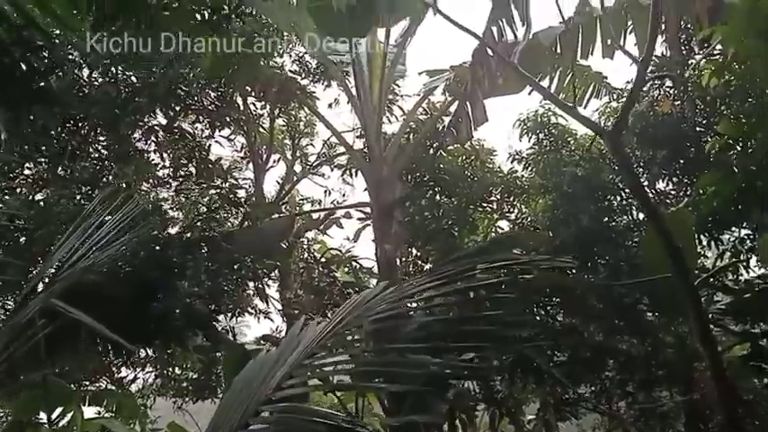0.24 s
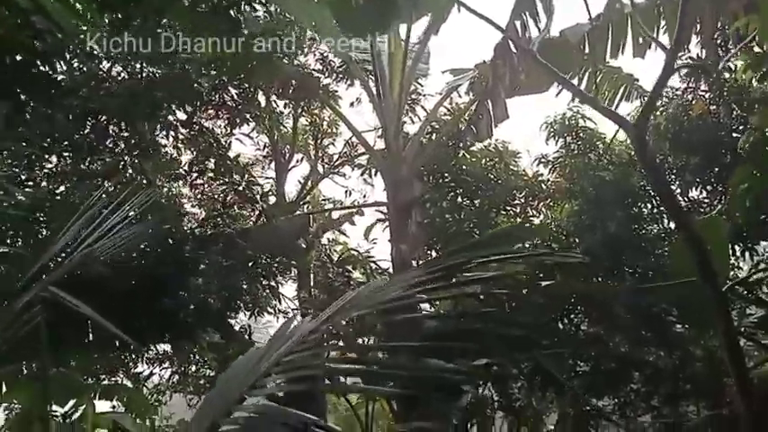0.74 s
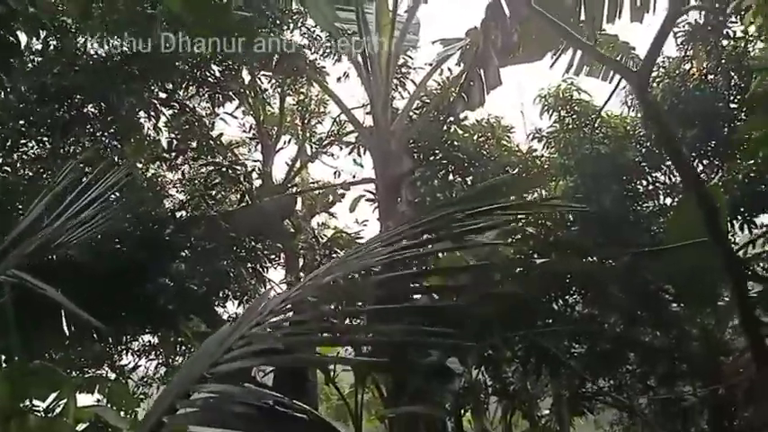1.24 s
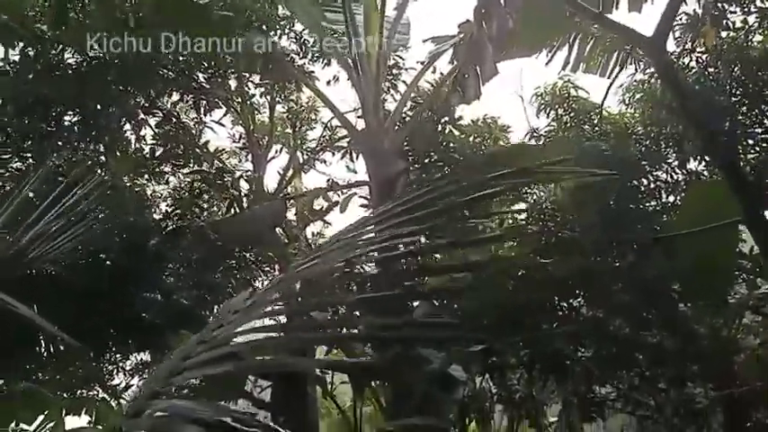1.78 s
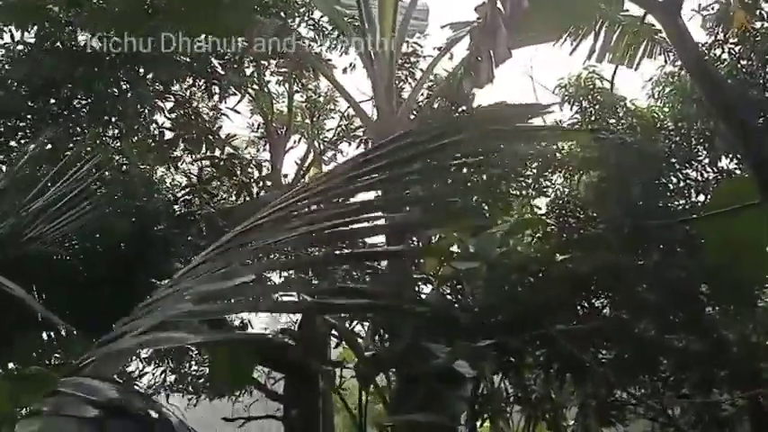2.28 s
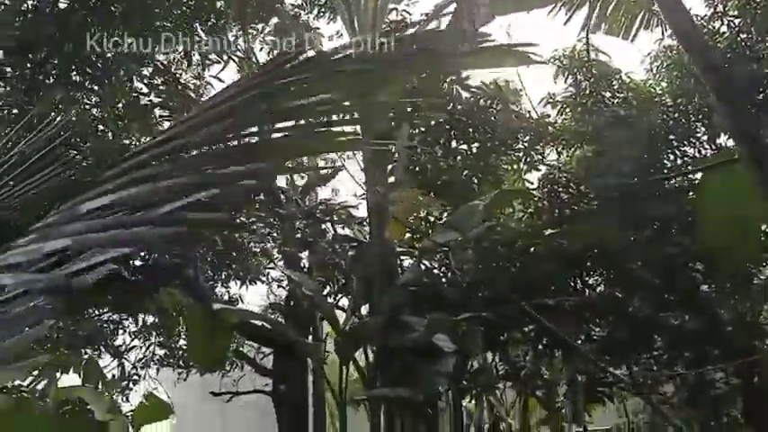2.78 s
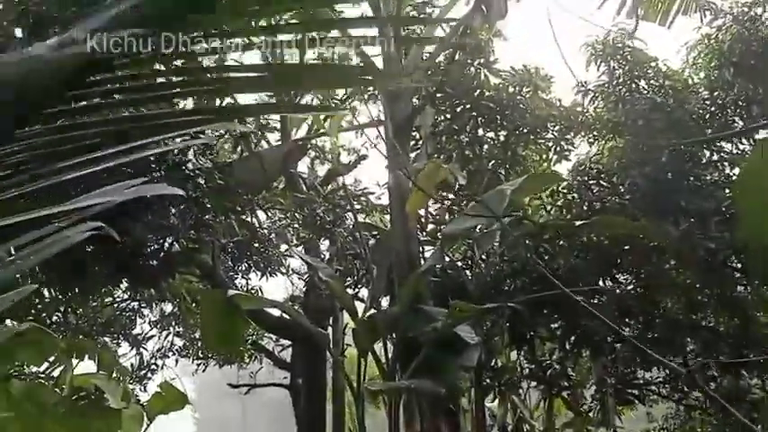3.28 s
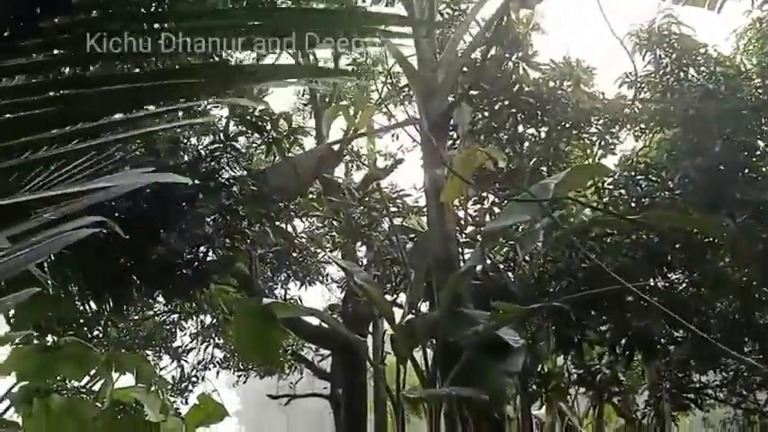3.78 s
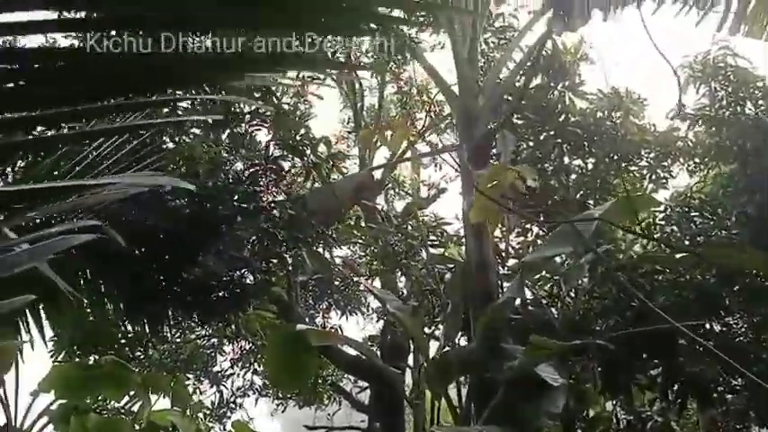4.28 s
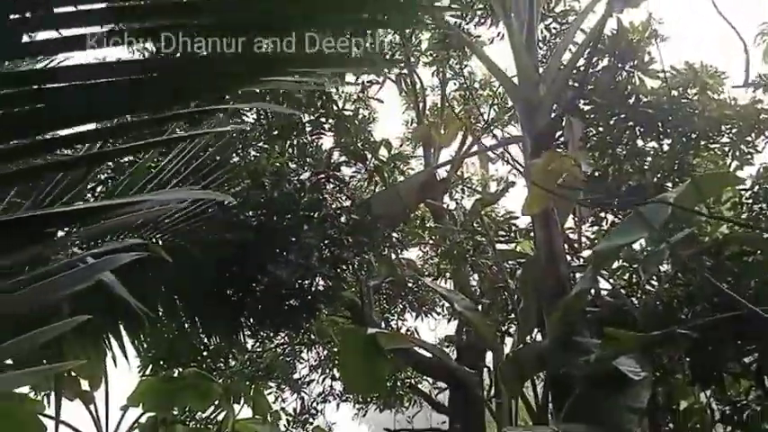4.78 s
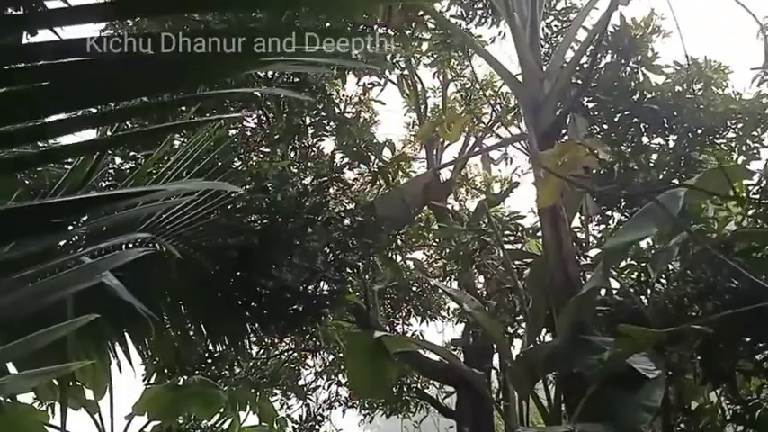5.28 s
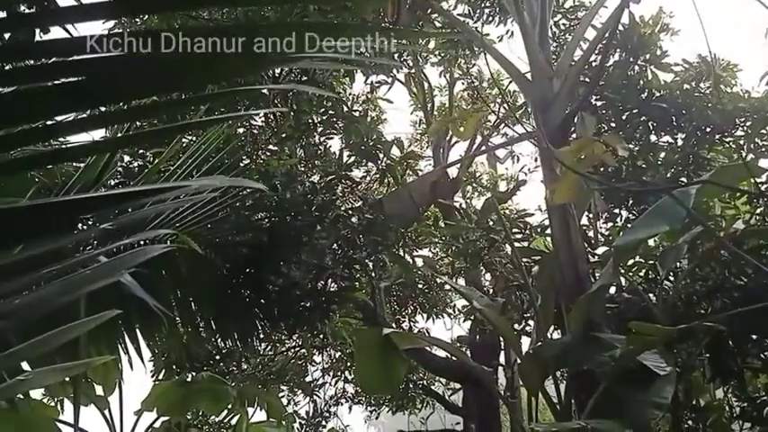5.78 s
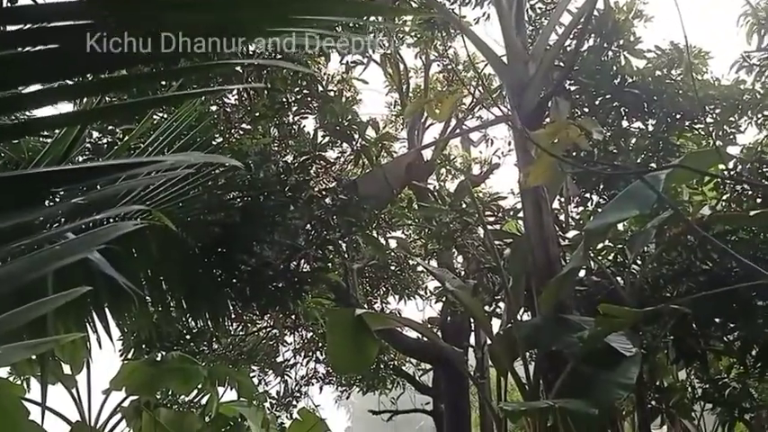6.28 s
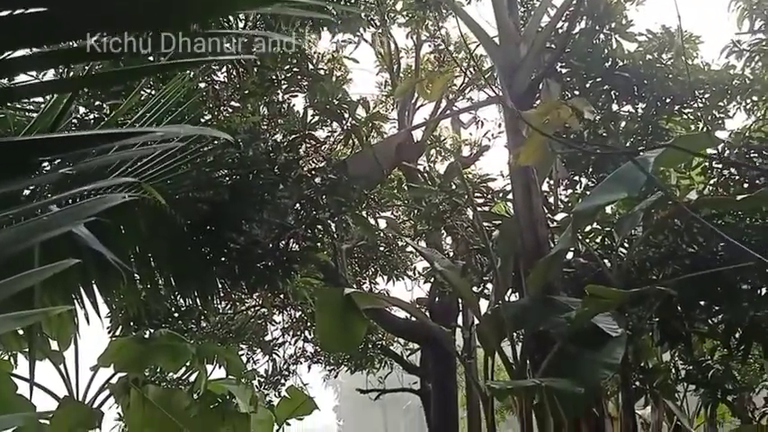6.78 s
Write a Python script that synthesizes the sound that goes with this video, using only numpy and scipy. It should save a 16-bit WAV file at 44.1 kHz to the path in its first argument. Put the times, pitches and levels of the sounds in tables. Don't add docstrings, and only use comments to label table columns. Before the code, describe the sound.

A leafy garden full of birds, heard in wide stereo for about seven seconds. From 0.25 s to the end, a nearby bird repeats a high, bright cheep that scoops upward and holds briefly, roughly every half second. Behind it a flock scolds hoarsely, raspy and breathy, swelling near 0.9, 1.5, 2.7, 3.7, 4.5 s and again from 5.7 s, mixed with short rough caws. A dove hums faintly until about 1.6 s. Dry little bill snaps tick between 1.8 and 5.2 s. Farther birds scatter thin whistles, reedy notes and downward slides throughout. From 5.45 s quick faint chips trill as a singer slurs a buzzy whistle up and down, then up again until 6.6 s; a tiny nasal squeak comes at 6.95 s. Notes waver and echo softly off leaves. Gentle airy hiss, far traffic and a barely audible low engine continue underneath.

```python
import sys
import numpy as np
from scipy import signal
from scipy.fft import rfft, irfft
from scipy.io import wavfile
from scipy.ndimage import uniform_filter1d

SR = 44100
rng = np.random.default_rng(int(sys.argv[2]) if len(sys.argv) > 2 else 0)


def field_ratio(decibels):
    return 10 ** (np.asarray(decibels, dtype=float) / 20)


def dump_mix(stems):
    frames = np.atleast_2d(stems).T
    limited = np.clip(frames, -1, 1)
    pcm = np.round(limited * 32767).astype(np.int16)
    wavfile.write(sys.argv[1], SR, pcm)


N = 310905


def rms_one(x):
    return x / np.sqrt(np.mean(np.abs(x) ** 2) + 1e-20)


def at_hz(points, hz):
    point_hz, point_db = np.array(points)[:, 0], np.array(points)[:, 1]
    return np.interp(np.log(hz), np.log(point_hz), point_db)


def bin_hz():
    return np.maximum(np.arange(N // 2 + 1) * SR / N, 1)


def span(rows):
    s, *columns = np.transpose(rows)
    at = np.arange(round(s[0] * SR), min(round(s[-1] * SR), N))
    return at[0], [np.interp(at / SR, s, c) for c in columns]


def seconds(length):
    return np.arange(round(length * SR)) / SR


def drift(size, rate_hz, channels):
    step, settle = 16, 1500
    r = np.exp(-2 * np.pi * rate_hz * step / SR)
    smoothing = [[1, 0, 0, 1, -2 * r, r * r], [1, 0, 0, 1, -r * r, 0]]
    noise = rng.standard_normal((channels, size // step + settle + 2))
    slow = signal.sosfilt(smoothing, noise)[:, settle:]
    return np.array([np.interp(np.arange(size) / step, np.arange(len(v)), rms_one(v)) for v in slow])


def add(out, at, sound, pan_db=0):
    size = min(sound.shape[1], N - at)
    out[:, at:at + size] += (sound * field_ratio(np.array([[.5], [-.5]]) * pan_db))[:, :size]


def voiced(t, attack_s, hold_s, fade_db_per_s):
    return -30 * np.clip(1 - t / attack_s, 0, 9) - fade_db_per_s * np.maximum(t - hold_s, 0)


def whistle(hz, db, scatter, waver_hz):
    phase = 2 * np.pi * (np.cumsum(hz) / SR + rng.random())
    paths = drift(len(hz), waver_hz, channels=4)
    share = np.clip(scatter, 0, 1)
    from_ends = np.minimum(np.arange(len(hz)), np.arange(len(hz))[::-1])
    edge = np.minimum(from_ends / (0.0016 * SR), 1)
    in_phase = (np.sqrt(2 - 2 * share) + np.sqrt(share) * paths[:2]) * np.sin(phase)
    return field_ratio(db) * edge * (in_phase + np.sqrt(share) * paths[2:] * np.cos(phase))


def coloured(source, spectrum):
    return rms_one(irfft(rfft(source) * field_ratio(at_hz(spectrum, bin_hz())), N))


def near_bird():
    # start in seconds, time to full voice in seconds, first partial in dB, octave in dB,
    # share of the pitch it starts below.
    cheeps = [(0.251, 0.063, -33, -27, 0.087), (0.664, 0.08, -34.5, -28.5, 0.048),
              (1.119, 0.086, -40.5, -30, 0.062), (1.552, 0.079, -39.5, -30.5, 0.079),
              (2.067, 0.07, -37.5, -28, 0.05), (2.581, 0.093, -38.5, -32.5, 0.024),
              (3.103, 0.057, -34.5, -30.5, 0.053), (3.635, 0.073, -35.5, -31, 0.0347),
              (4.152, 0.07, -38, -30.5, 0.018), (4.64, 0.072, -34, -31, 0.03),
              (5.169, 0.068, -35.5, -30, 0.014), (5.66, 0.054, -36, -26.5, 0.019),
              (6.104, 0.069, -37.5, -27.5, 0.061), (6.502, 0.073, -35, -25, 0.083)]
    # multiple of the pitch, level in dB relative to the octave.
    upper_partials = [(3, -23), (4, -31.5)]
    top_hz, rise_s, sag_per_s = 3352, 0.01207, 0.0549
    first_attack_s, octave_attack_s, swell_depth_db = .009, 0.014, 4.5
    first_fade_db_per_s, octave_fade_db_per_s = 300, 248
    octave_late_db, octave_late_s = 7.5, 0.088
    flutter_width_hz = 75
    out, t = np.zeros((2, N)), seconds(.3)
    scatter = 0.33 + 3.35 * t
    flutter_db = -6 - 9 * t / .045
    for s, full_s, first_db, octave_db, scoop in cheeps:
        at = round(s * SR)
        bend = scoop * np.exp(-np.maximum(t - .005, 0) / rise_s) + sag_per_s * np.minimum(t, .15)
        hz = top_hz * (1 + 0.00152 * rng.standard_normal()) * (1 - bend)
        swell_db = -swell_depth_db * np.maximum(1 - t / full_s, 0)
        low_db = first_db + swell_db + voiced(t, first_attack_s, full_s, first_fade_db_per_s)
        high_db = octave_db + swell_db + voiced(t, octave_attack_s, full_s, octave_fade_db_per_s)
        high_db = high_db - octave_late_db * np.exp(-t / octave_late_s)
        add(out, at, whistle(hz, low_db, scatter, 29.8))
        add(out, at, whistle(2 * hz, high_db, scatter, 54.6))
        add(out, at, whistle(hz, low_db + flutter_db, 0.99, flutter_width_hz))
        add(out, at, whistle(2 * hz, high_db + flutter_db, 1, 2 * flutter_width_hz))
        catch_db = octave_db - 30.5 + voiced(t, 0.0052, 0.018, 600)
        add(out, round((s - .008) * SR), whistle(5200 + 0 * t, catch_db, 1, 140))
        for multiple, db in upper_partials:
            add(out, at, whistle(multiple * hz, high_db + db, 0.78, 55))
    return out


def song():
    # time in seconds, pitch in Hz, effort in dB, beak opening as dB of the upper partials.
    slurs = [
        [(5.465, 533.4, -58, 3), (5.55, 623.7, -48, 0), (5.605, 663, -46, 2), (5.636, 786, -40.5, 2),
         (5.72, 807, -37, -8), (5.8, 802, -38, -16), (5.86, 717, -43.5, -26), (5.95, 617, -44.5, -26),
         (6.01, 599, -45, -18)],
        [(6.01, 597, -48, -21), (6.08, 699.5, -44, -18), (6.17, 682, -40.5, -5), (6.255, 709.4, -37, -1.5),
         (6.275, 749.4, -35, -11), (6.4, 763, -44, 0), (6.5, 797, -45, 5), (6.53, 785, -41.5, -6),
         (6.57, 702, -45, 1)],
    ]
    # frequency in Hz, level in dB.
    singer_throat = [(700, -38), (1250, -19), (1650, -17), (2350, 1), (3100, -5), (3900, -35)]
    out = np.zeros((2, N))
    for slur in slurs:
        at, (hz, db, open_db) = span(slur)
        rasp_db = np.minimum(-4.5 - .08 * (hz - 700), 3)
        hz = hz * (1 + .007 * drift(len(hz), 40, channels=1)[0])
        for multiple in range(1, 6):
            upper = multiple > 3
            level_db = db + at_hz(singer_throat, multiple * hz) + open_db * upper
            partial_rasp_db = level_db + rasp_db - 8 * (multiple < 3)
            add(out, at, whistle(multiple * hz, level_db, .5 + 0.42 * upper, 22), 1.5)
            add(out, at, whistle(multiple * hz, partial_rasp_db, 0.63, 200), 1.5)
    return out


def squeak():
    # start in seconds, length in seconds, pitch in Hz.
    s, length, squeak_hz = (6.947, 0.04, 1185)
    # multiple of the pitch, level in dB.
    squeak_partials = [(1, -68), (2, -32.5), (3, -36), (4, -50), (5, -49.5), (6, -51), (7, -56), (9, -74)]
    out, t = np.zeros((2, N)), seconds(.12)
    for multiple, db in squeak_partials:
        level_db = db - 2.5 - 20 * (t > length) - 60 * t
        add(out, round(s * SR), whistle(multiple * squeak_hz + 0 * t, level_db, 0.39, 18.5))
    return out


def caws():
    # start in seconds, length in seconds, first pitch in Hz, last pitch in Hz, level in dB.
    caw_rows = [(0.199, 0.079, 508, 532, -50.5), (0.766, 0.16, 493, 513, -58.5),
                (0.963, 0.13, 536, 501, -53), (1.333, 0.076, 352, 343.6, -54.5),
                (1.659, 0.13, 449, 457, -63.5), (2.629, 0.18, 344, 349, -57),
                (2.873, 0.13, 383, 372, -56.5), (3.738, 0.082, 488, 483, -62),
                (4.234, 0.18, 449, 515, -51.5), (4.45, 0.13, 481, 530.5, -52),
                (4.598, 0.13, 254.7, 282.6, -47), (4.736, 0.056, 513.5, 506, -49.5),
                (5.194, 0.06, 507, 488, -51), (5.463, 0.14, 527, 644, -55), (6.02, .1, 620, 714, -47.5),
                (6.045, 0.097, 518.5, 533, -50), (6.714, 0.15, 494.5, 511, -57.5),
                (6.563, .15, 441, 446, -54), (6.885, .07, 312, 312, -59)]
    # frequency in Hz, level in dB.
    caw_throat = [(1000, -32), (1400, -20.5), (1600, -12), (2100, -5.5), (2600, -3), (3200, -14),
                  (4200, -24), (5200, -33)]
    out = np.zeros((2, N))
    for s, length, first_hz, last_hz, db in caw_rows:
        at, t = round(s * SR), seconds(length + .06)
        glide_hz = last_hz + (first_hz - last_hz) * np.maximum(1 - t / length, 0) ** 2
        hz = glide_hz * (1 + .006 * drift(len(t), 30, channels=1)[0])
        voice_db = db + voiced(t, .008, length, 501)
        uneven_db = 2.0 * drift(len(t), 7.4, channels=15)
        for multiple in range(3, 15):
            level_db = voice_db + at_hz(caw_throat, multiple * hz) + uneven_db[multiple]
            add(out, at, whistle(multiple * hz, level_db, .6, 25), 1.5)
            add(out, at, whistle(multiple * hz, level_db + 1.5, 1, 120), 1.5)
    return out


def snaps():
    # start in seconds, peak level in dB, ringing frequency in Hz.
    clicks = [(2.089, -39.5, 2440), (2.296, -45, 1930), (2.5252, -53, 1480), (2.547, -56, 1900),
              (2.337, -58, 2000), (2.353, -65, 1950), (1.796, -48, 1700), (1.821, -58, 1510),
              (1.906, -57, 1800), (3.285, -44.5, 1900), (3.3523, -38.5, 2090), (3.7371, -39, 1870),
              (3.74, -47, 513), (3.756, -41, 1900), (3.121, -44, 2100), (3.145, -50, 1690),
              (3.95, -42, 1910), (4.2822, -33, 2250), (4.8457, -47, 1510), (4.903, -41, 2570),
              (5.001, -54, 1600), (5.015, -51, 1610), (5.034, -52, 1600), (4.076, -50, 1710),
              (4.094, -53, 1710), (3.921, -45, 1730), (5.184, -39, 2100), (5.2134, -43, 2600),
              (5.2383, -33.5, 2020)]
    out, t = np.zeros((2, N)), seconds(.03)
    for s, db, hz in clicks:
        ring = np.sin(2 * np.pi * hz * t) * np.exp(-t / 0.0015) * np.minimum(t / 0.00026, 1)
        add(out, round(s * SR), field_ratio(db + 2.5) * np.array([ring, ring]))
    return out


def glided(rows, octave_db, third_db=-60, scatter=0.64, waver_hz=80):
    out = np.zeros((2, N))
    for s, length, first_hz, last_hz, db, pan_db in rows:
        t = seconds(length + .01)
        if first_hz < 1.02 * last_hz:
            remaining = np.exp(-t / (0.006 + min(.2 * length, .02)))
        else:
            remaining = np.maximum(1 - t / length, 0)
        hz = last_hz + (first_hz - last_hz) * remaining
        hz = hz * (1 + .004 * drift(len(t), 30, channels=1)[0])
        level_db = db - 2.0 - 9 * np.exp(-t / 0.0008)
        sound = whistle(hz, level_db, scatter, waver_hz)
        sound = sound + whistle(2 * hz, level_db + octave_db, 0.95, 93)
        sound = sound + whistle(3 * hz, level_db + third_db, 0.9, 140)
        add(out, round(s * SR), sound, pan_db)
    return out


def close_notes():
    # start in seconds, length in seconds, first pitch in Hz, last
    # pitch in Hz, level in dB.
    gulps = [
        (6.195, 0.0255, 1100, 764, -74),
        (6.586, 0.022, 1560, 760, -54.5),
        (3.9, .05, 410, 348, -65),
        (3.87, 0.082, 385, 380, -68),
        (2.59, .04, 415, 350, -69),
        (6, .05, 510, 840, -66.5),
    ]
    # start in seconds, length in seconds, first pitch in Hz, last pitch in Hz, level in dB,
    # left-right difference in dB.
    clear_notes = [(0.775, .165, 1960, 2065, -48.5, -1), (4.5, .09, 1700, 2300, -50, -5),
                   (4.025, 0.039, 2820, 2770, -53.5, 0), (4.085, 0.039, 3480, 3130, -53, -1),
                   (0.113, 0.023, 2880, 2620, -52, -4), (9.7, 0.1, 3400, 2200, -53, -1),
                   (5.2, 0.073, 2900, 2530, -49.5, -3), (3.98, 0.047, 2630, 2640, -60, -5),
                   (4.08, 0.1, 2200, 2500, -56, 0), (4.235, 0.24, 1450, 1570, -62, 1),
                   (1.66, 0.12, 1800, 1600, -64, 0), (2.88, 0.12, 2830, 2610, -51.5, 0),
                   (0.17, 0.028, 2700, 2450, -55, -5), (0.2, 0.22, 2300, 2680, -57, 0),
                   (0.375, 0.055, 2900, 2830, -51.5, -2), (0.59, .065, 2860, 2600, -52.5, 1),
                   (2.76, 0.07, 3120, 4000, -57, 2), (2.6, 0.036, 3120, 2400, -57, 2),
                   (0.83, 0.11, 3040, 2600, -56, 4), (1.285, 0.093, 3335, 3800, -52.5, -4)]
    return glided([(*row, 0) for row in gulps] + clear_notes, -31, scatter=0.24, waver_hz=25)


def held(rows, scoop):
    return [(s, length, hz * (1 - scoop), hz, db, pan_db) for s, length, hz, db, pan_db in rows]


def neighbours():
    # start in seconds, length in seconds, pitch in Hz,
    # level in dB, left-right difference in dB.
    far_cheeps = [(0.03, 0.1, 3218, -57.5, 2), (0.52, 0.12, 3192, -59, 0), (0.92, 0.096, 3170, -60, 0),
                  (1.44, 0.049, 3230, -68, 7), (2.0, 0.069, 3220, -59, 4.5), (3.2, 0.16, 3176, -55, -1),
                  (3.55, 0.1, 3240, -57.5, 11.5), (3.89, 0.087, 3262, -55.5, -1.5),
                  (4.96, 0.073, 3250, -57, -2.5)]
    pure_notes = [(0.13, 0.043, 1750, -61, -3), (0.39, 0.1, 1778, -65.5, 1), (0.48, 0.027, 1976, -62.5, -5),
                  (0.97, 0.063, 2570, -53, 2), (1.5, 0.39, 1800, -63, -5), (1.55, 0.26, 1130, -68.5, 1),
                  (2.2, 0.04, 2650, -59, 2), (2.39, 0.055, 3023, -60.5, -5), (2.74, 0.081, 3875, -45.5, 2),
                  (3.44, 0.09, 2610, -53.5, -3), (3.87, 0.21, 2720, -60.5, 5),
                  (4.27, 0.015, 2228, -40.5, -2), (5.05, 0.14, 2750, -63, 0),
                  (6.06, 0.081, 2128, -41.5, -3.5)]
    thin_notes = [(0, 0.031, 6705, -50, 1), (1.14, 0.083, 7060, -46.5, 3), (1.58, 0.098, 6955, -49, 3),
                  (2.055, 0.048, 7170, -64, -3), (2.06, 0.081, 4830, -61.5, -2),
                  (2.35, 0.076, 5040, -58.5, -5.5), (2.38, 0.14, 6940, -61.5, -5),
                  (3.12, 0.075, 6640, -63, -35), (3.58, 0.044, 6470, -55.5, 0),
                  (2.805, 0.038, 4750, -56, 0), (5.7, 0.092, 8920, -64.5, 7),
                  (1.045, 0.034, 4060, -51.5, -5), (1.07, .04, 4860, -53, -2), (4.96, 0.12, 5150, -65.5, 2),
                  (6.815, 0.04, 4280, -57, -3), (6.885, .09, 3986, -54, 0)]
    # start in seconds, length in seconds, pitch in Hz, level in dB, share of pitch it starts below.
    reedy_notes = [(0, .11, 4680, -56, 0.041), (0.655, 0.035, 2630, -49, 0.035),
                   (0.656, 0.092, 4590, -58.5, 0.11), (2.578, 0.13, 2866, -50, 0.057),
                   (3.061, 0.16, 2860, -52, 0.12), (3.282, 0.071, 4440, -57.5, 0.0367),
                   (3.604, 0.1, 2830, -49.5, 0.079), (4.309, 0.17, 4610, -53.5, 0.3),
                   (5.315, 0.078, 4770, -62, 0.1), (5.386, .07, 4756, -48.5, 0.0095),
                   (5.7, 0.07, 4630, -59, 0.15), (5.978, 0.044, 4690, -49, 0.13),
                   (6.358, 0.095, 4365, -57.5, 0.0235), (6.722, 0.062, 4760, -54, 0.06)]
    # start in seconds, length in seconds, first pitch in Hz, last pitch in Hz, level in dB.
    slides = [(0.467, 0.03, 2700, 2660, -53), (1.07, 0.038, 3640, 3414, -44),
              (2.53, 0.045, 2940, 2800, -53), (3.505, 0.039, 4420, 3790, -56.5),
              (3.6, 0.059, 4150, 3450, -58), (3.295, .04, 3300, 2450, -54.5), (3.31, .025, 4450, 3700, -60),
              (6.3, 0.015, 4250, 3400, -55), (4.133, 0.15, 3600, 3900, -56.5),
              (4.44, 0.096, 2220, 2500, -42.5), (4.845, 0.095, 4260, 2600, -56.5),
              (5.372, 0.037, 4200, 3120, -57), (6.143, 0.035, 4150, 3800, -57),
              (6.57, .04, 3330, 3300, -59), (6.969, 0.015, 4000, 1710, -60), (1.55, 0.096, 4700, 4350, -58),
              (1.45, 0.052, 5410, 5230, -59), (0.049, 0.057, 4300, 4100, -59.5),
              (5.84, 0.041, 3300, 2920, -62), (5.506, .05, 9100, 8000, -61), (5.51, 0.03, 4800, 4200, -53),
              (5.535, 0.035, 4250, 3450, -51.5), (5.56, .03, 4800, 3700, -55)]
    # start in seconds, level in dB.
    trill = [(5.452, -60), (5.48, -60), (5.51, -62), (5.6, -62), (5.64, -62), (5.676, -61), (5.775, -63),
             (5.855, -59), (5.892, -58), (5.915, -64), (5.94, -59), (6.031, -59), (6.055, -64), (6.08, -63),
             (6.108, -60), (6.141, -58), (6.176, -61), (6.385, -62), (6.418, -56), (6.452, -58),
             (6.48, -62), (6.765, -61), (6.79, -60)]
    chips = [(s, .018, 4720, 4200, db, -5) for s, db in trill]
    reedy = [(s, length, hz * (1 - scoop), hz, db, 2.5) for s, length, hz, db, scoop in reedy_notes]
    plain = held(pure_notes, 0.029) + held(thin_notes, 0.009)
    plain = plain + [(*row, -1.5) for row in slides] + chips
    cheeping = glided(held(far_cheeps, 0.0243), -0.58)
    return cheeping + glided(reedy, -9.5, third_db=-21) + glided(plain, -35.0)


def dove():
    # time in seconds, pitch in Hz, level in dB.
    hum = [(0.1, 605.7, -68.5), (0.258, 587.9, -67.5), (1.052, 588, -61), (1.374, 560, -71.5),
           (1.494, 594.7, -75), (1.6, 610, -78)]
    out = np.zeros((2, N))
    at, (hz, db) = span(hum)
    add(out, at, whistle(hz, db, 1.0, 22))
    add(out, at, whistle(2 * hz, db - 9.5, 1.0, 10.2))
    add(out, at, whistle(3 * hz, db - 7.5, 1.0, 27))
    return out


def scolding(which, lag, fade_db_per_s):
    # start in seconds, time to open in seconds, length in seconds, throat in dB, hiss in dB.
    calls = [(0, 0.0099, 0.19, -56.5, -72), (0.103, 0.2, 0.17, -46.5, -78),
             (0.717, 0.029, 0.19, -49.5, -61), (0.894, 0.093, 0.25, -42.5, -50),
             (1.33, 0.019, 0.22, -52, -67.5), (1.485, 0.051, 0.3, -50, -59), (2.607, 0.026, 0.22, -49, -58),
             (2.71, 0.042, 0.3, -48.5, -57), (3.066, 0.018, 0.29, -55.5, -62.5),
             (3.57, .05, 0.11, -74, -58.5), (3.666, 0.079, 0.051, -40.5, -46),
             (3.788, .03, 0.29, -54.5, -64.5), (4.134, 0.1, 0.19, -47, -80), (4.331, 0.11, 0.2, -45, -54),
             (4.512, 0.11, 0.2, -40.5, -46), (4.892, 0.02, 0.45, -60.5, -92),
             (5.122, 0.046, 0.039, -50.5, -85), (5.42, 0.047, 0.19, -56.5, -61),
             (5.607, 0.037, 0.084, -54, -57.5), (5.73, 0.079, 0.19, -49, -60),
             (5.958, 0.13, 0.25, -50, -60), (6.289, 0.024, 0.21, -54.5, -58.5),
             (6.503, 0.073, 0.45, -47, -57.5), (6.83, 0.07, 0.14, -44, -50.5)]
    t = np.arange(0, N / SR + .01, .002)
    power = 0
    for s, attack_s, length, *levels in calls:
        power = power + field_ratio(2 * (levels[which] + voiced(t - s, lag * attack_s, length, fade_db_per_s)))
    return np.interp(np.arange(N) / SR, t, np.sqrt(power))


def streaked(x, depth_db):
    spectra = signal.stft(x, nperseg=512)[2]
    streaks = rng.standard_normal(spectra.shape[1:])
    for _ in range(2):
        streaks = uniform_filter1d(streaks, size=14, axis=1)
    return rms_one(signal.istft(spectra * field_ratio(depth_db * rms_one(streaks)), nperseg=512)[1][:, :N])


def flock():
    # frequency in Hz, level in dB per Hz.
    throat = [(600, -9.5), (1200, -0.5), (1550, -17), (2000, 12), (2600, 17), (3300, 14.5), (4200, -72),
              (5200, -39)]
    hiss_spectrum = [(4000, 0), (5500, -1.5), (7000, 2), (9300, -3), (11400, -8.5), (12300, -13),
                     (15500, -14.5)]
    pulses = (rng.random(N) < 500 / SR) * (.5 + rng.random(N))
    chop = 1.8 + rms_one(signal.lfilter([1], [1, -np.exp(-1 / (.001 * SR))], pulses))
    breath, throats = chop * rng.standard_normal((2, N)), 0
    for hz, swell in zip(np.geomspace(800, 5000, 30), drift(N, 6.0, channels=30)):
        r = np.exp(-np.pi * .024 * hz / SR)
        resonance = [1, -2 * r * np.cos(2 * np.pi * hz / SR), r * r]
        ring = signal.lfilter([1 - r, 0, r - 1], resonance, breath)
        throats = throats + field_ratio(at_hz(throat, hz) + 3.5 * swell) * ring
    low_pass = signal.butter(4, 3700, fs=SR, output="sos")
    voices = scolding(0, 1, 119) * rms_one(signal.sosfilt(low_pass, throats))
    hiss = streaked(coloured(breath, [(2500, -55)] + hiss_spectrum + [(17000, -62)]), 5)
    return voices + field_ratio(1.5) * scolding(1, 1.3, 159) * hiss


def air():
    # frequency in Hz, left-right likeness from 0 to 1.
    likeness = [(30, .9), (60, 1), (180, 0.64), (550, 0.69), (1650, 0.014), (4970, 0.016), (15000, 0.01)]
    # frequency in Hz, level in dB per Hz.
    air_spectrum = [(20, -47), (40, -41), (62, -1), (125, 0.5), (300, -7), (1200, -12.5), (2600, -5),
                    (4200, -17), (6400, -12), (7600, -20.5), (9300, -15.5), (11500, -22), (15500, -23)]
    alike = np.clip(at_hz(likeness, bin_hz()), 0, 1)
    mid, side = rfft(rng.standard_normal((2, N))) * [np.sqrt(1 + alike), np.sqrt(1 - alike)]
    gusts_db = 1.0 * drift(N, 0.19, channels=1)
    noise = irfft(np.array([mid + side, mid - side]), N)
    return field_ratio(-59 + gusts_db) * coloured(noise, air_spectrum)


def engine():
    # time in seconds, level in dB.
    rumble = [(0.0, -63), (0.96, -69), (1.08, -63.5), (1.55, -72), (4.32, -74), (4.46, -88), (6.64, -74),
              (7.05, -69)]
    _, (db,) = span(rumble)
    band = signal.butter(2, [52, 76], "band", fs=SR, output="sos")
    low = signal.sosfilt(band, rng.standard_normal(len(db)))
    out = np.zeros((2, N))
    add(out, 0, field_ratio(db - 4.5) * rms_one(low)[None])
    return out


def leaves(x, t60, wet_db):
    t = seconds(.9)
    shape = field_ratio(-60 * t / t60) + field_ratio(-22.0 - 60 * t / 1.6)
    paths = rng.standard_normal((2, len(t))) * shape / np.sqrt(np.sum(shape ** 2))
    return x + field_ratio(wet_db) * signal.fftconvolve(x, paths, axes=1)[:, :N]


def scene():
    close = near_bird() + song() + squeak() + dove() + caws() + snaps() + close_notes()
    near = leaves(close, t60=0.36, wet_db=-8.5)
    far = leaves(neighbours(), t60=0.33, wet_db=2.5)
    return near + far + flock() + air() + engine()


def shadowed(x):
    # frequency in Hz, left-right difference in dB.
    ports = [(500, 0), (2000, -4), (2800, -0.5), (3300, 4.5), (4600, -1.5), (5100, -2.5), (6700, -10),
             (8000, 6.5), (9500, 5.5), (12000, -0.5)]
    hz, left_lead_s = bin_hz(), .00005
    shade = field_ratio(np.outer([.5, -.5], at_hz(ports, hz)))
    lead = np.exp(1j * np.pi * np.outer([1, -1], hz) * left_lead_s)
    return irfft(rfft(x) * shade * lead * (hz < 15560), N)


def gated(x):
    # frequency in Hz, share of the time dropped.
    thrown = [(10300, .45), (11600, .5), (12400, .75), (13400, .45), (14200, .65), (15500, .75)]
    size, width = 2048, 12
    shadow_start_db, fall_db_per_band = 18.5, 4.4
    spectra = signal.stft(x, nperseg=size)[2]
    bands = spectra[:, :1020].reshape(2, -1, width, spectra.shape[2])
    level_db = 10 * np.log10(np.mean(np.abs(bands) ** 2, axis=(0, 2)) + 1e-20)
    index = np.arange(len(level_db))
    band_hz = index[:, None] * width * SR / size
    fall_db = fall_db_per_band * index[:, None]
    shadow_db = np.maximum.accumulate(level_db + fall_db, axis=0) - fall_db - shadow_start_db
    whim_db = uniform_filter1d(rng.standard_normal(level_db.shape), 5, axis=1) * 14
    shares = at_hz(thrown, (index + .5) * width * SR / size)
    chance_db = level_db + whim_db
    floor_db = np.array([[np.quantile(row, share)] for row, share in zip(chance_db, shares)])
    faint = (band_hz > 10300) & (chance_db < floor_db)
    lull_db = np.quantile(level_db, .04, axis=1, keepdims=True)
    lulls = (band_hz > 3600) & (level_db + .5 * whim_db < lull_db)
    heard = (level_db + .3 * whim_db > shadow_db) & ~faint & ~lulls
    kept = spectra * np.pad(np.repeat(heard, width, axis=0), [(0, 5), (0, 0)])
    return signal.istft(kept, nperseg=size)[1][:, :N]


def top_cut(x):
    return signal.sosfilt(signal.butter(12, 15610, fs=SR, output="sos"), x)


def record(dry):
    mix = gated(shadowed(dry))
    return top_cut(mix)


dry = scene()
out = record(dry)
dump_mix(out)
```